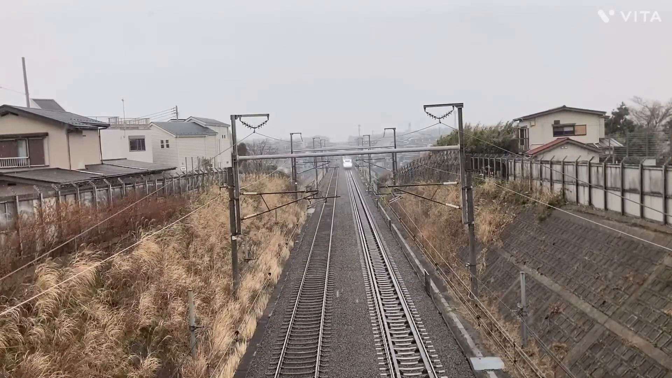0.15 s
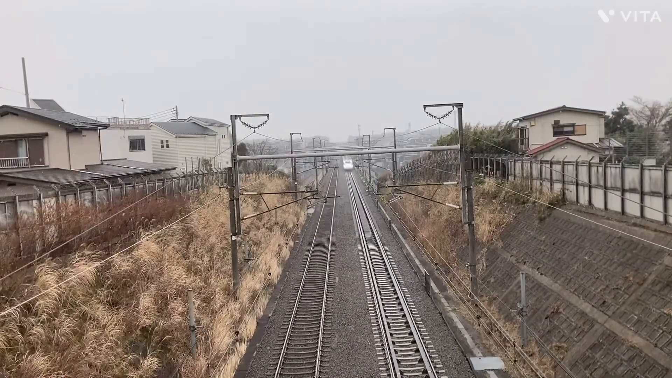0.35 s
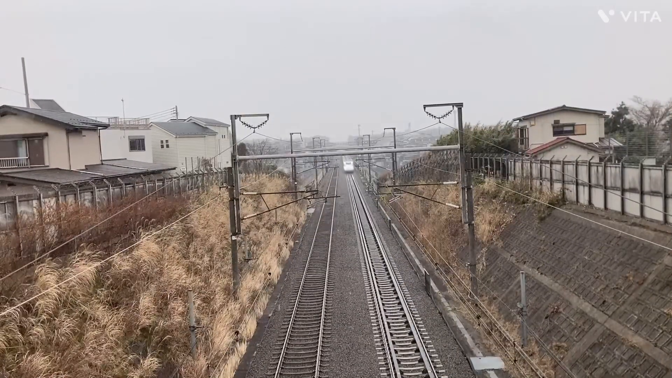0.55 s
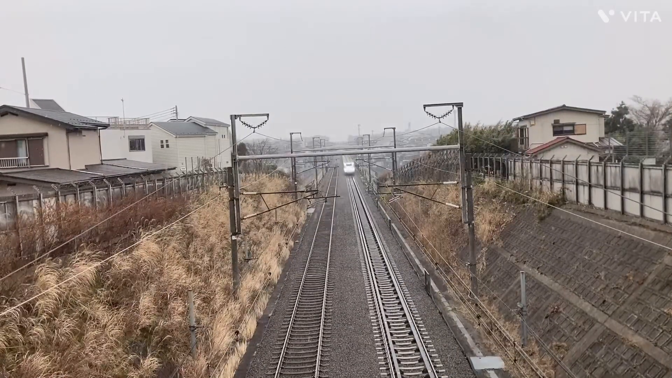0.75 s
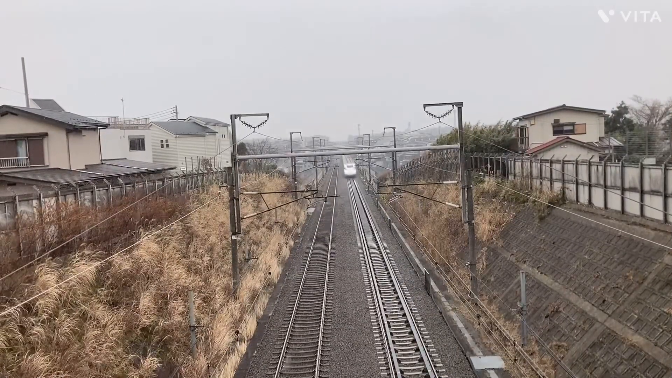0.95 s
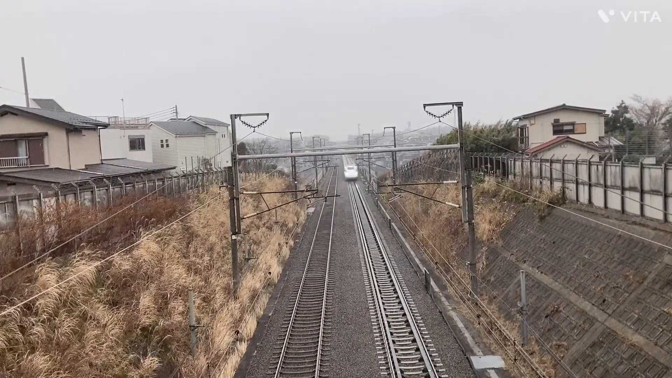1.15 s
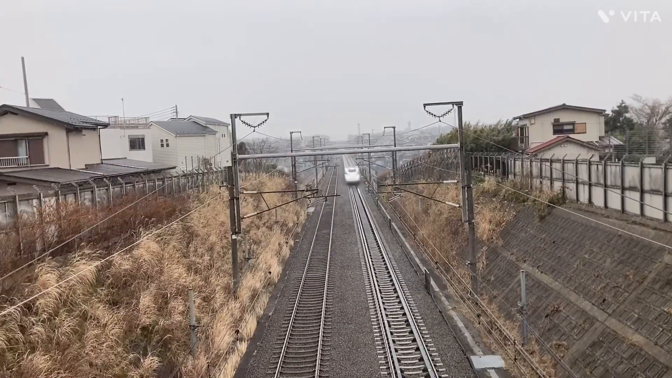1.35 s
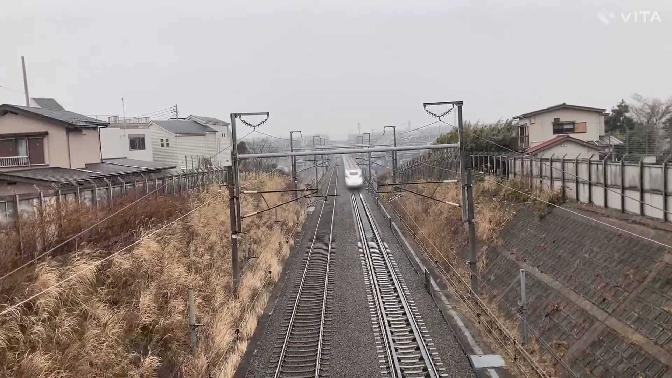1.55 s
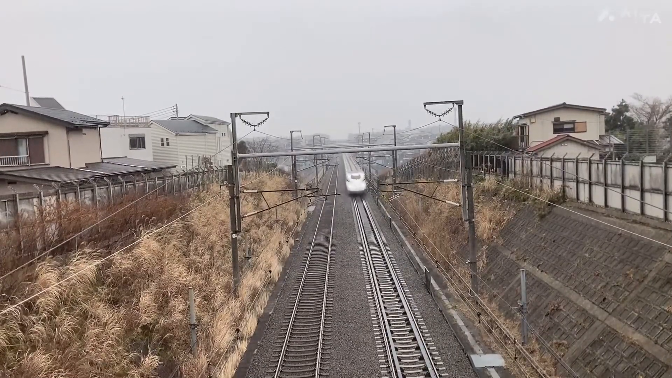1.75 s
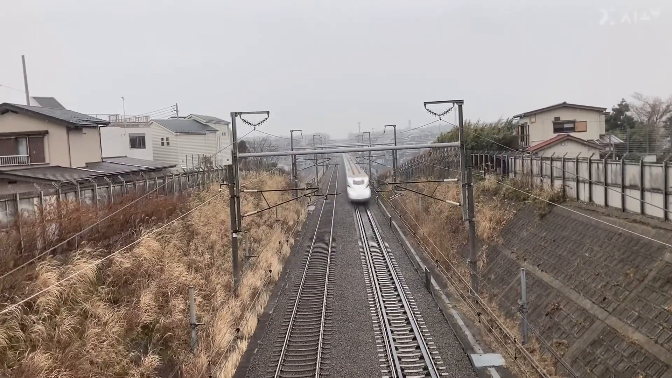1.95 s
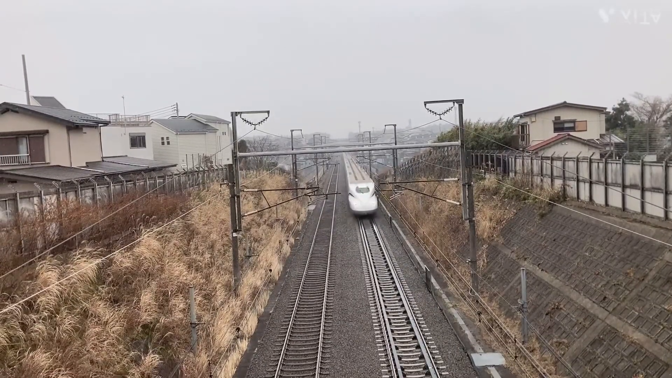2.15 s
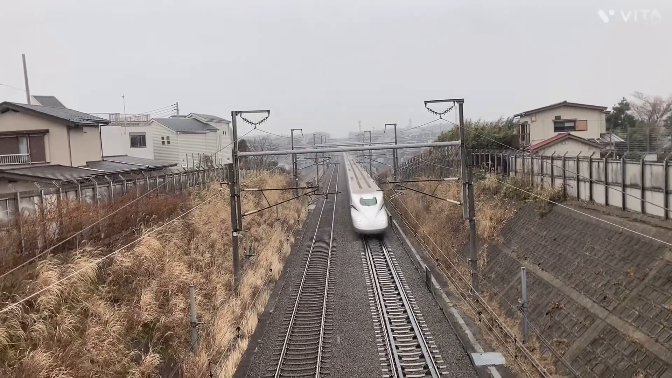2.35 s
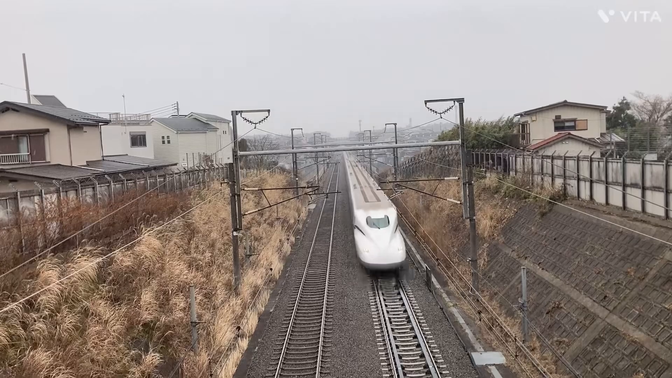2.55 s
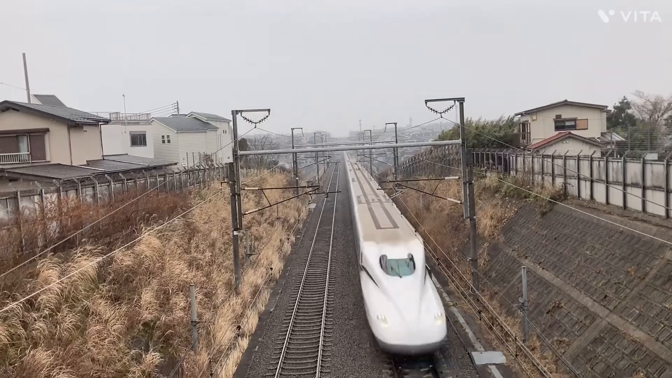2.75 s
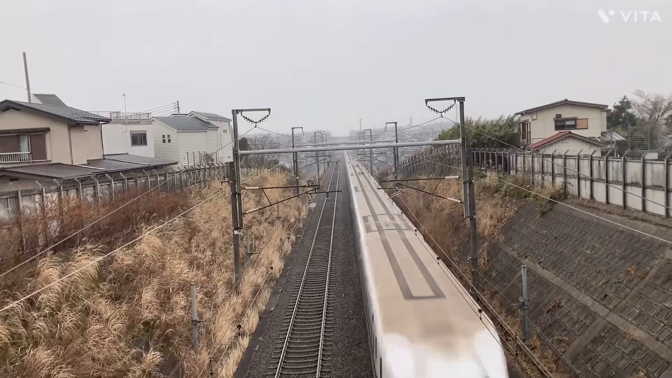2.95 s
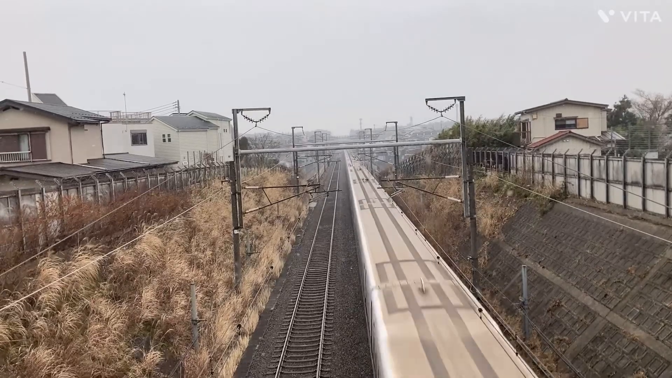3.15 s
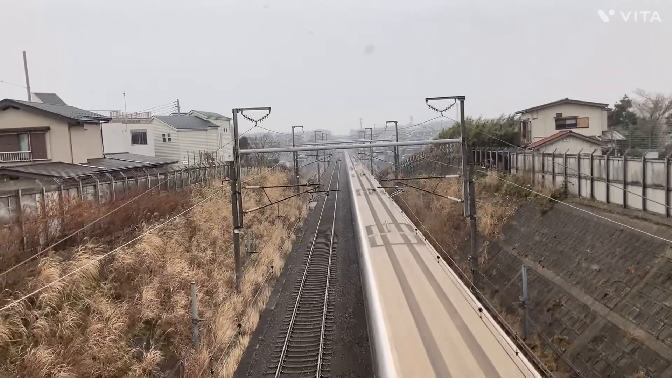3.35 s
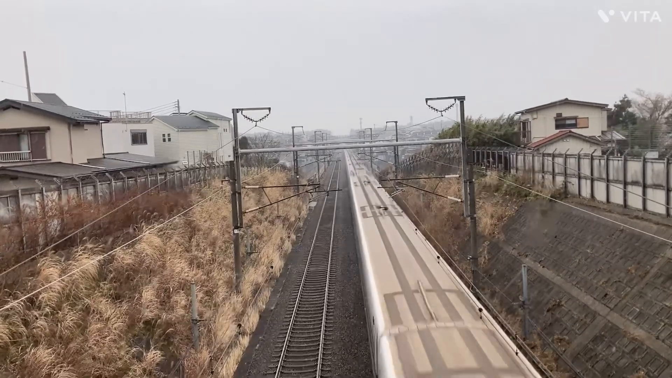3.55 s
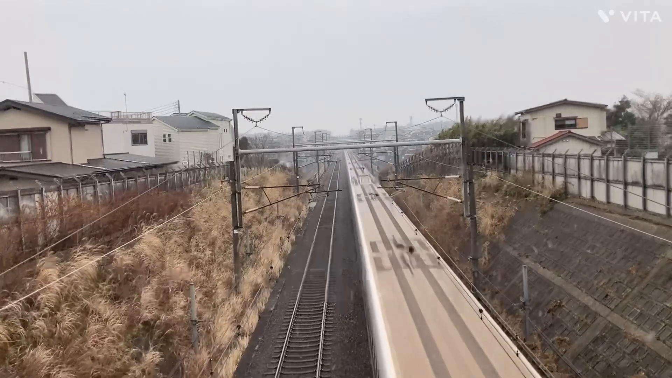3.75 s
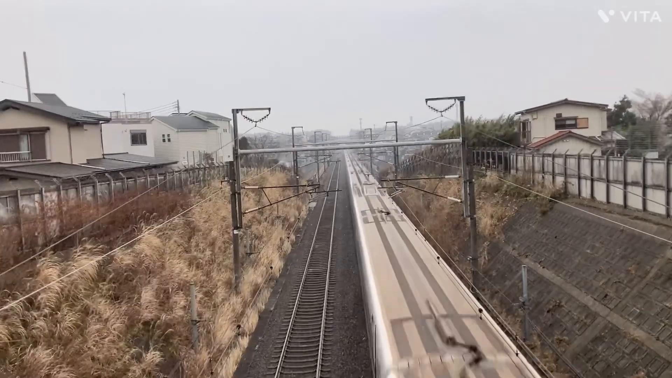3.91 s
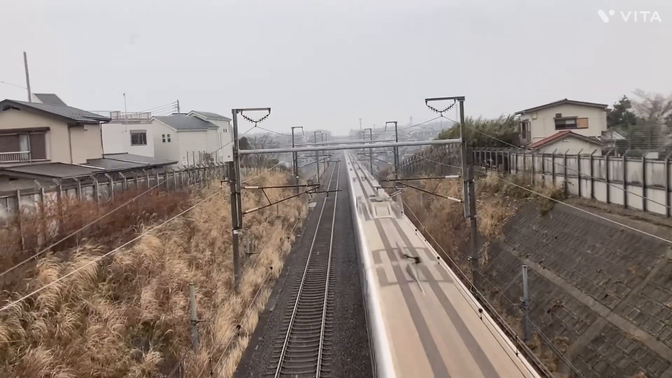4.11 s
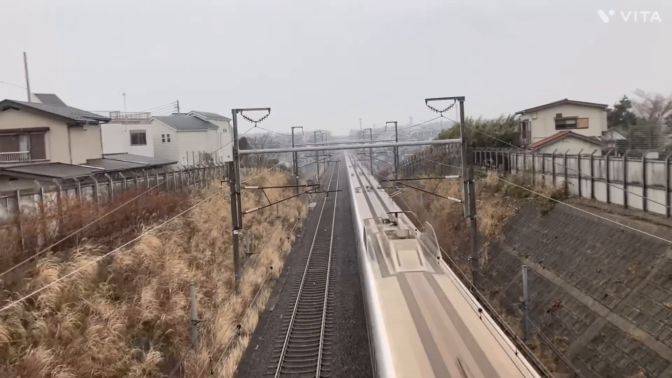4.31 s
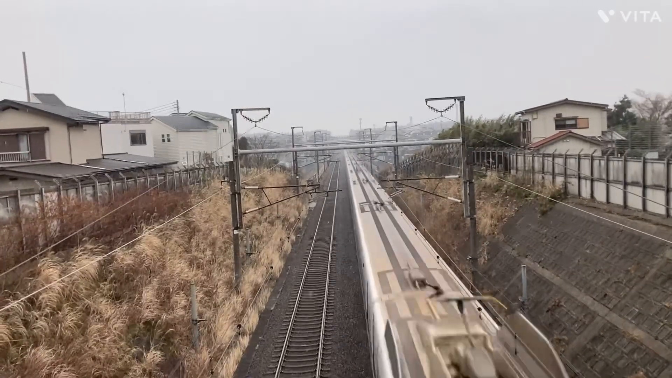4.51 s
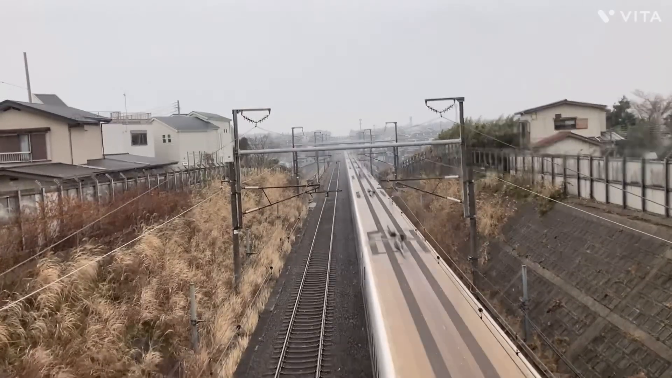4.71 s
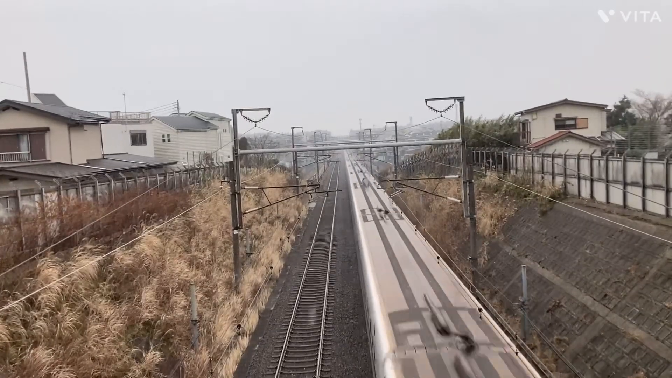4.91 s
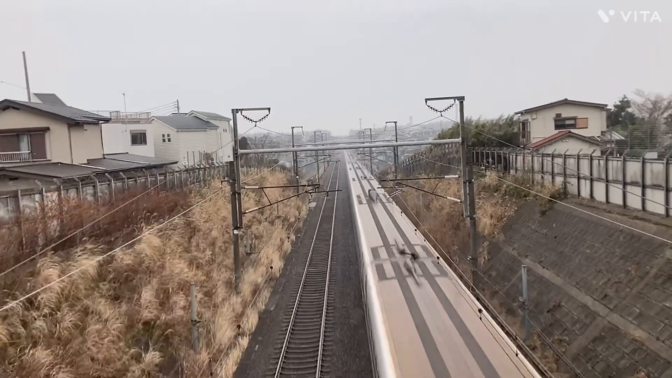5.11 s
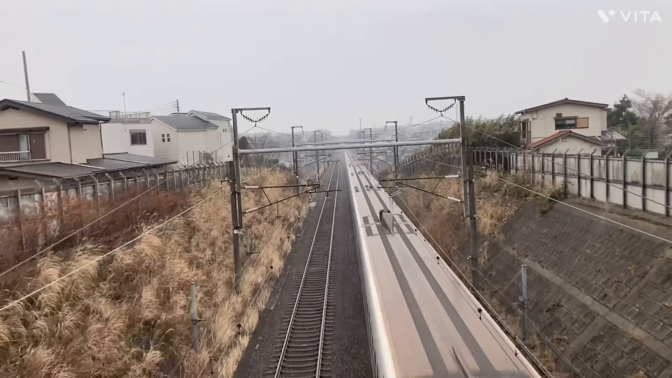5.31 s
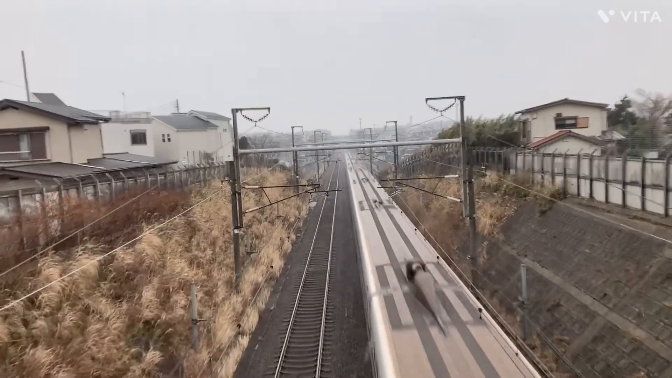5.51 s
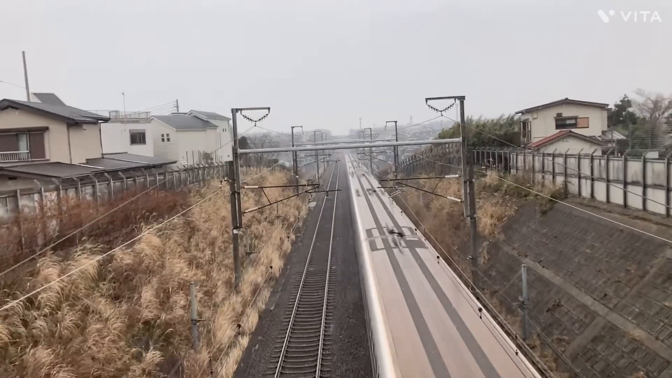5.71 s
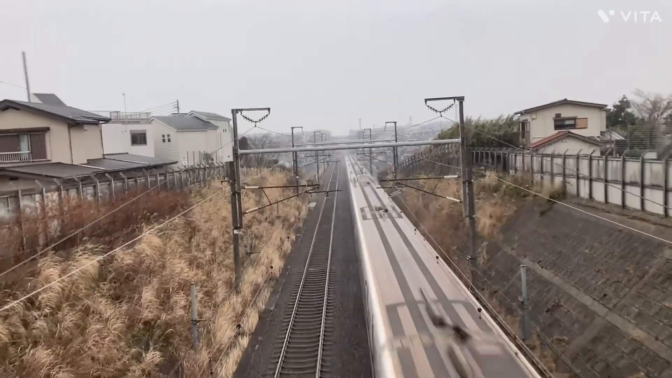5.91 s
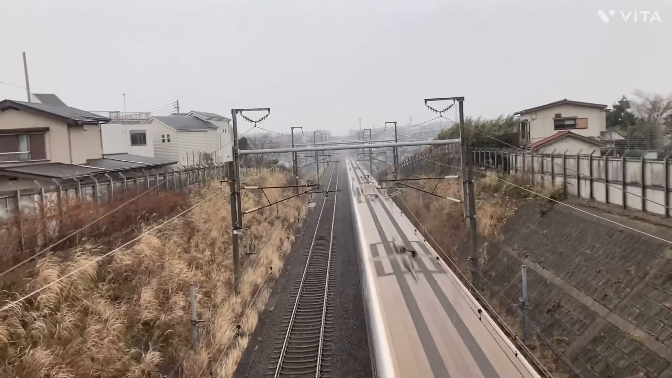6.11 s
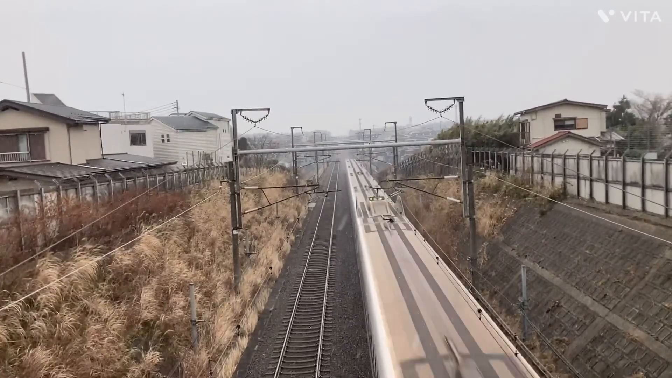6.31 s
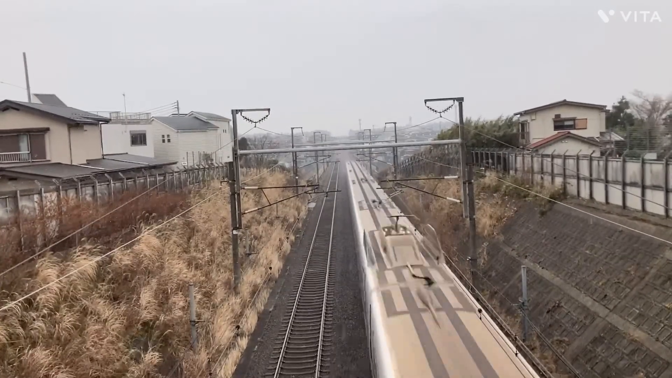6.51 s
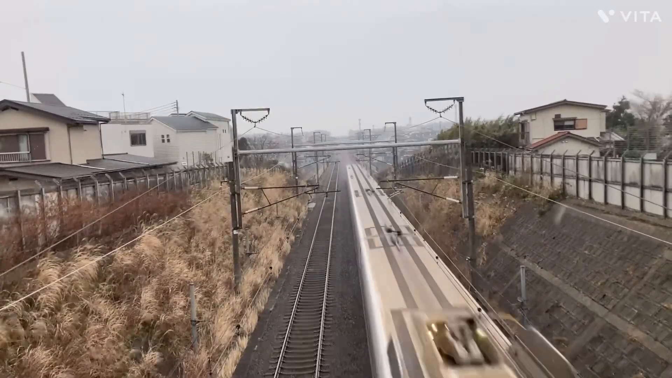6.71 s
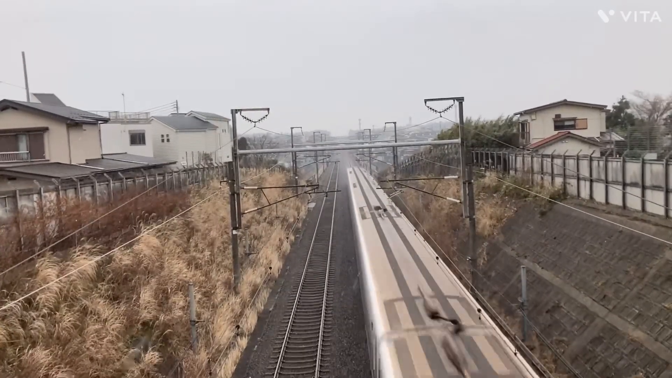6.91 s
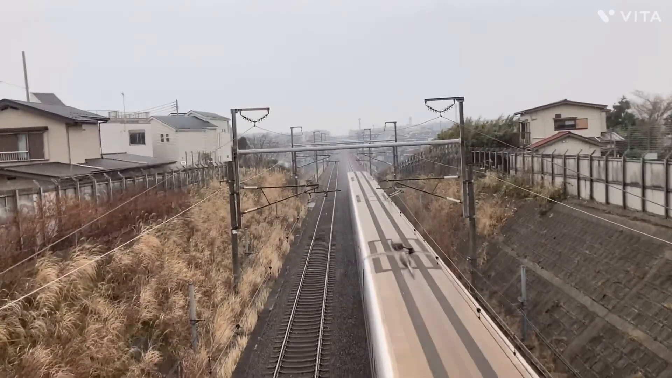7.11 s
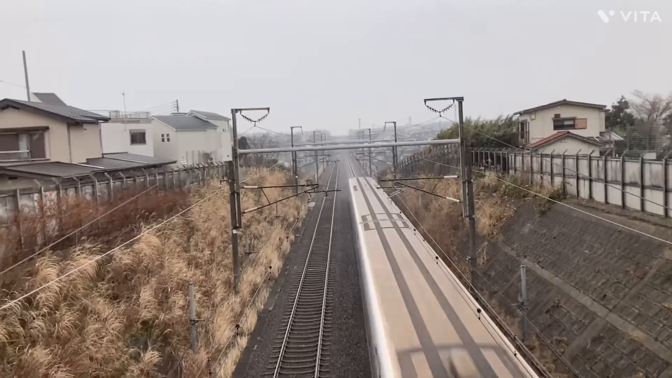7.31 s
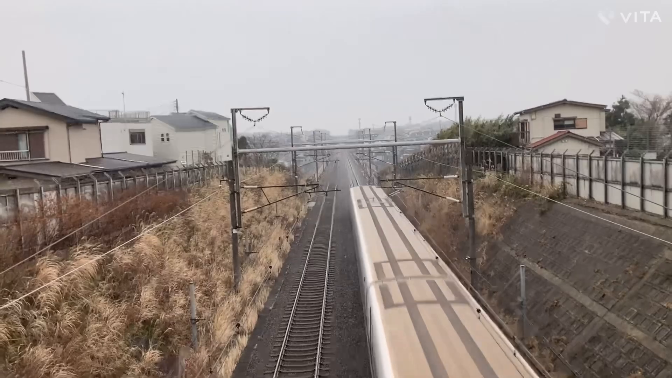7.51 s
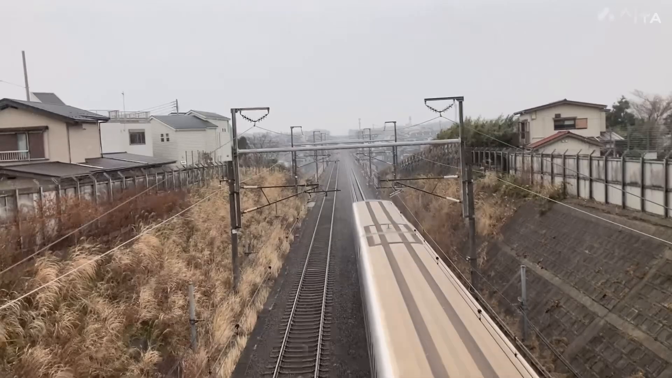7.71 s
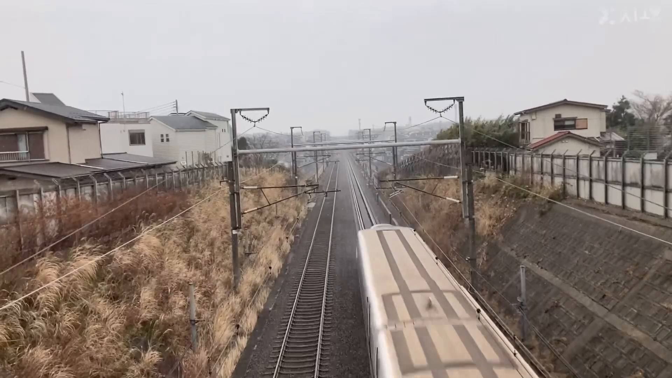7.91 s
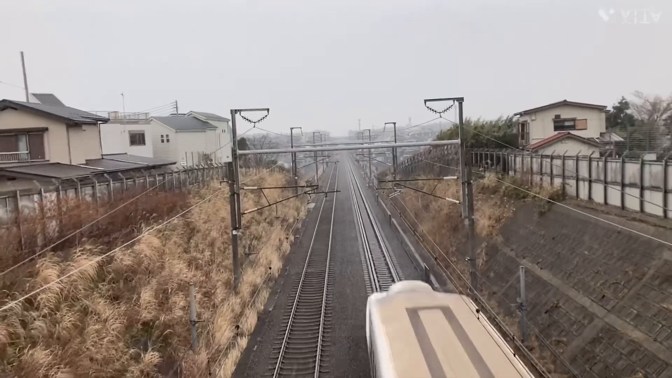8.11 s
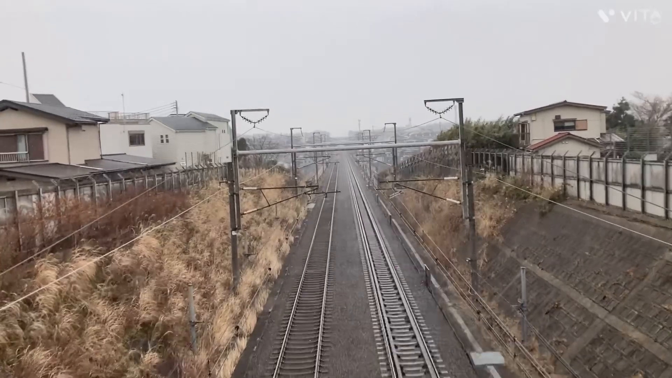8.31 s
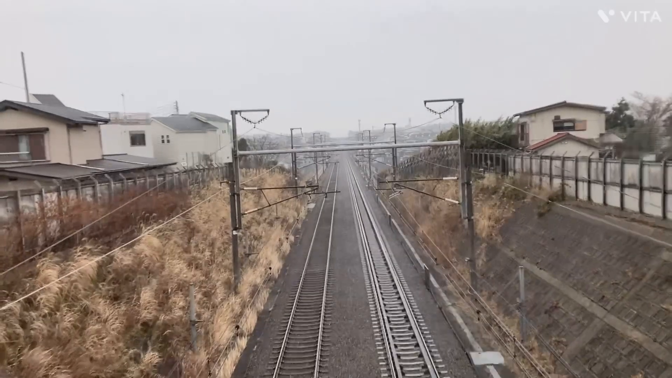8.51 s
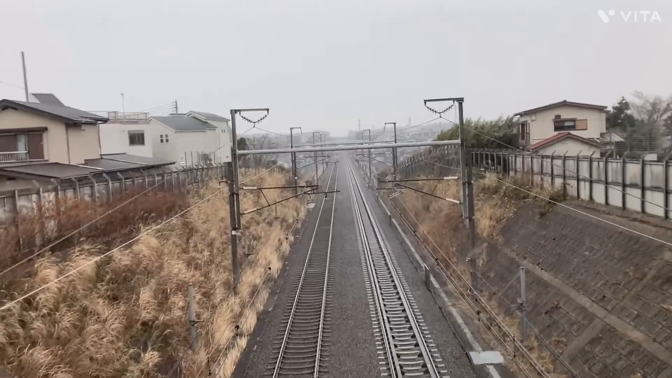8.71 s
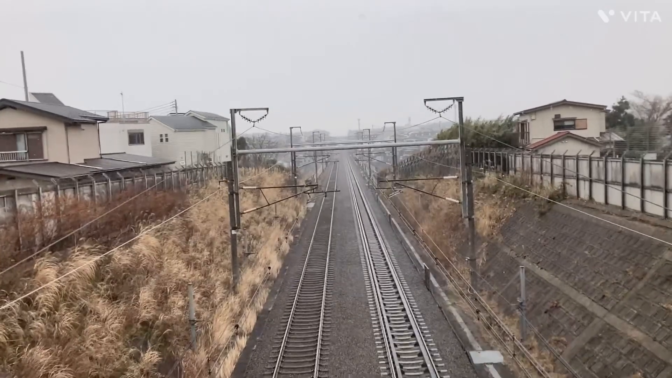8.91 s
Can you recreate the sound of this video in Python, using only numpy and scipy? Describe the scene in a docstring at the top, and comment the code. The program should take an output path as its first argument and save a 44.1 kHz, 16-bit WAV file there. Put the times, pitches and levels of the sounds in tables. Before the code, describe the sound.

Heard from a bridge, distant roar swells into a fast train's deep thundering pass below, with ringing track and whooshing bogies, then drops away abruptly.

```python
"""On a bridge over a cutting: a sixteen-car high-speed train passes right underneath.
Ahead of it: distant roar, climbing drone and singing rails, as coloured noise and wavering tones.
Under the bridge: fluttering flow noise rumbles and hisses, bogie pairs swish by, track modes ring.
Two pantographs roar past as noise bursts, the first with a vortex whistle; wake gusts end the pass."""
import sys
import numpy as np
from scipy import signal
from scipy.fft import rfft, irfft, next_fast_len
from scipy.io import wavfile

SR = 44100
rng = np.random.default_rng(int(sys.argv[2]) if len(sys.argv) > 2 else 0)


def file_out(sig):
    """Save sig as 16-bit WAV at sys.argv[1]."""
    # one column per channel
    cols = np.atleast_2d(sig).T
    # limit, then scale
    lim = np.clip(cols, -1, 1)
    pcm = np.round(lim * 32767).astype(np.int16)
    wavfile.write(sys.argv[1], SR, pcm)


N = 394694
TIME_S = np.arange(N) / SR
FFT_SIZE = next_fast_len(N)
FREQ_HZ = np.maximum(np.arange(FFT_SIZE // 2 + 1) * SR / FFT_SIZE, 1)

# Train ends reach the bridge
NOSE_S, TAIL_S = 2.897, 8.335
# Rush of air below, strongest at the nose: t/s, level/dB
RUSH = [(2.8, 8), (3.05, 8.5), (3.5, 6.5), (3.95, 5), (4.55, 7), (4.92, 0), (5.55, 1.5), (5.92, 0),
        (6.2, 2), (6.7, 1), (7.2, 0.5), (8.4, -0.5)]
# Whole-train sounds: base level/dB, share of rush, rise/(dB/s), hold after tail/s, fall/(dB/s)
DEEP_PASS = (-20, 0.38, 27, 0.6, 84)
RUMBLE_PASS = (-22, 0.71, 19, 0.6, 46)
HISS_PASS = (-37.5, 1.2, 27.5, 0.13, 45.5)
ROLL_PASS = (-34.5, 1.2569, 19, 0.3, 55)
RING_PASS = (-38, 0.78, 24, 0.0, 68)

# Noise colours, relative density: f/Hz, level/dB
# Boundary layer: large eddies
DEEP_SPECTRUM = [(25, -29), (40, -11.5), (55, -0.5), (75, 1), (95, -0.5), (130, -7.5), (250, -88)]
# Boundary layer: middle eddies
RUMBLE_SPECTRUM = [(60, -13.5), (90, -5.5), (115, -1), (180, -0.5), (235, -4), (310, -9.5), (400, -16.5),
                   (600, -24), (1500, -72)]
# Boundary layer: smallest eddies
SKIN_SPECTRUM = [(2000, -55), (4500, -13), (6000, -3.5), (7200, 2), (10500, 1.5), (13000, 0), (16000, 2)]
# Rolling wheels
ROLL_SPECTRUM = [(100, -16), (430, 1), (780, 0.8), (1100, -2.5), (1450, -3.5), (2000, -5.5), (2400, -10.5),
                 (3500, -9.5), (5000, -12), (7000, -21.5), (16000, -48)]
# Bogie swish
SWISH_SPECTRUM = [(700, -11.5), (1500, -0.5), (2200, -1), (3100, -2.5), (4200, -5.5), (5600, -12.5),
                  (8000, -8.5), (16000, -14)]
# Bogie roar
BOGIE_ROAR_SPECTRUM = [(100, -16), (250, 3.5), (450, -10), (650, 6), (1000, -2), (1500, 0), (2200, -6.5),
                       (5000, -27.5)]
# Air torn by roof gear
TEAR_SPECTRUM = [(50, -16), (120, 1.5), (260, 2.5), (450, -8), (700, -4), (1300, -7.5), (2200, -12.5),
                 (5000, -19.5), (8000, -16), (16000, -21)]
# Wake gusts on the microphone
BUFFET_SPECTRUM = [(40, -7), (200, 6.5), (400, 2), (800, -6.5), (1200, -14), (2000, -26), (5000, -55),
                   (16000, -73)]
# Train in the distance
DISTANT_SPECTRUM = [(120, 6), (200, -1), (350, 2.5), (550, 3), (760, 5), (1020, 1.5), (1220, -5.5),
                    (1450, 1), (1830, 1), (1990, -4), (3000, -6), (4200, -16), (6500, -26), (9500, -44),
                    (16000, -42)]

# Bogies at car ends: t/s, roar/dB, swish/dB, swish half length/s, track note/dB
BOGIES = [(3.069, -25, -22.5, 0.046, -38), (3.361, -46, -26, 0.046, -45), (3.729, -45, -24.5, 0.048, -33),
          (4.052, -23.5, -26, 0.049, -38), (4.42, -22.5, -26, 0.089, -40), (4.72, -25.5, -32, 0.054, -45),
          (5.07, -26.5, -30.5, 0.07, -41), (5.396, -28, -29, 0.051, -39), (5.74, -24, -46, 0.043, -37),
          (6.063, -26.5, -26, 0.042, -37), (6.398, -26.5, -31, 0.051, -43),
          (6.74, -27.5, -26.5, 0.068, -42.5), (7.081, -26, -28.5, 0.059, -40),
          (7.42, -25.5, -30, 0.055, -42), (7.761, -44, -31.5, 0.067, -41), (8.101, -50, -31.5, 0.073, -39),
          (8.491, -32.5, -50, .04, -51)]
BOGIE_RUMBLE_DB = -2.5   # relative to bogie roar
GAP_RUMBLE_DB, GAP_SPAN_S = -2, 0.071   # car-gap churn, relative to body rumble
# Swishes at car gaps: t/s, f/Hz, width/Hz, peak/dB
GAP_HISSES = [(4.05, 3300, 900, -31), (5.39, 2570, 700, -28.5), (6.06, 3010, 1100, -29),
              (8.41, 3800, 1500, -38)]
GAP_HISS_SPAN_S = 0.025
# Echo off the cutting's side, latest with a bogie right below
WALL_LAG_MS, WALL_SPAN_S, WALL_ECHO_DB = 6.5, 0.297, -11
# Short wandering echo, makes rolling and swish ragged
RAGGED_LAG_MS, RAGGED_LAG_SWING_MS, RAGGED_ECHO_DB = 3.6, 0.7, -7

# Track resonances, one narrow and one broad: f/Hz, width/Hz, level/dB
TRACK_MODES = [(1804, 24, -12), (2000, 340, -9)]
RING_WAVER_DB, RING_WAVER_HZ = 4, 13
RING_LAG_S, RING_SPAN_S = 0.037, 0.046   # track note peaks just behind each bogie
SQUEAL_HZ, SQUEAL_WAVER_HZ, SQUEAL_WAVER_DB = 1814, 11.06, 2.5
SQUEAL_SPREAD_DB = -8   # noisy skirt of the track note
# Track notes under single wheels: t/s, f/Hz, peak/dB
SQUEALS = [(2.897, 2164, -28), (2.955, 1819, -22.5), (3.088, 1830, -20), (3.425, 1808, -23),
           (3.525, 1830, -28), (4.087, 1803, -27), (4.43, 1805, -28), (5.13, 2015, -36), (5.468, 1884, -29),
           (5.764, 1975, -35), (6.12, 1880, -32), (6.583, 1819, -30), (7.68, 1960, -32), (8.104, 2072, -32),
           (8.145, 1800, -30), (8.435, 1808, -31.5), (8.487, 1776, -33)]
SQUEAL_SPAN_S, SQUEAL_SAG = 0.019, 0.008   # sag: pitch share lost either side of the peak

# Pantographs, roof fittings and tail tearing the air: t/s, peak/dB, rise/s, fall/s
ROOF_GEAR = [(4.09, -23, 0.019, 0.048), (4.68, -15.5, 0.095, 0.035), (5.73, -29.5, .025, 0.017),
             (5.768, -28, .008, .012), (5.806, -22, 0.017, 0.0082), (6.54, -25, 0.091, 0.084),
             (6.89, -16.5, 0.085, 0.027), (7.47, -27.5, 0.039, 0.022), (8.575, -34, 0.033, 0.02)]
ROOF_RUMBLE_DB, ROOF_PRESSURE_DB = -0.5, -1.5   # relative to each burst
# Roof cavity howl: t/s, peak/dB, rise/s, fall/s
HOWLS = [(5.69, -27, 0.012, 0.025), (5.718, -19, .003, .004), (6.85, -27, 0.025, 0.019)]
CAVITY_HZ, CAVITY_WIDTH_HZ = 1400, 330
SIZZLE_HZ, SIZZLE_WIDTH_HZ, SIZZLE_DB = 6600, 1000, -37
# First pantograph's whistle: t/s, f/Hz, level before WHISTLE_GAIN_DB/dB
WHISTLE = [(3.95, 6280, -70), (4.03, 6250, -45), (4.17, 6280, -43), (4.29, 6330, -26.5), (4.33, 6320, -31),
           (4.355, 6240, -47), (4.4, 6280, -29), (4.47, 6280, -36), (4.54, 6280, -30), (4.6, 6150, -47),
           (4.65, 6110, -29), (4.668, 5960, -38), (4.682, 5870, -33), (4.71, 5700, -70)]
WHISTLE_GAIN_DB, WHISTLE_SKIRT_DB = 1.5, -7
WHISTLE_JITTER_HZ, WHISTLE_FLUTTER_DB = 22, 3

# Brief low notes in the rumble: t/s, f/Hz, peak/dB
LOW_NOTES = [(3.007, 91, -14), (3.007, 231, -14.5), (3.042, 327.6, -20), (4.156, 204, -16),
             (4.162, 69.1, -10), (4.441, 156, -12), (4.59, 113.3, -12), (6.844, 86, -12.5),
             (6.867, 177.3, -16), (6.891, 296.7, -15.5), (7.442, 160.4, -18)]
LOW_NOTE_SPAN_S, LOW_NOTE_SAG = 0.026, 0.0399
# Wake gusts on the microphone: t/s, peak/dB, rise/s, fall/s
GUSTS = [(8.694, -17.5, .0006, 0.0053), (8.721, -17, 0.00092, 0.012), (8.744, -18, .002, 0.0069),
         (8.758, -17, .0015, 0.0063), (8.778, -15.5, 0.0044, 0.0078), (8.798, -13, 0.0017, 0.0032),
         (8.806, -16, .0015, 0.0052), (8.825, -25, .004, 0.0095), (8.87, -34, 0.022, 0.045)]

# Carried along the cutting: t/s, far roar/dB, far wheel hiss/dB, rail singing/dB, boom/dB
AHEAD = [(0, -51.5, -72, -63.5, -42), (.65, -47, -67, -59.5, -41), (1.0, -41, -55, -57, -38.5),
         (1.5, -36, -47, -51, -37), (2.0, -35.5, -45.5, -45.5, -29), (2.55, -32.5, -47, -43, -26),
         (3.2, -40, -50.5, -41.5, -22.5), (8.3, -37.5, -51, -46, -31.5), (8.95, -46.5, -61, -42.5, -33)]
FAR_RUMBLE_DB = 4           # relative to far roar
FAR_RUMBLE_TOP_DB = -47.5   # far-roar level at which the far rumble stops growing
FAR_LAG_MS, FAR_LAG_MS_PER_S, FAR_ECHO_DB = 6.2, 0.481, -13   # cutting-side echo
FAR_RING_HZ, FAR_RING_WIDTH_HZ, FAR_RING_DB = 1640, 290, -9   # level relative to far roar
FAR_HISS_HZ, FAR_HISS_WIDTH_HZ = 3200, 750
BOOM_HZ, BOOM_WIDTH_HZ = 37, 12
# Low drone ahead of the train: t/s, f/Hz, level/dB
DRONE = [(.3, 58.4, -44), (.52, 58.6, -33), (.64, 58.35, -59), (.77, 57, -41), (1.1, 58.3, -43),
         (1.55, 56.96, -30), (1.75, 59.9, -42), (1.95, 62, -26), (2.25, 74, -24.5), (2.5, 78, -24),
         (2.9, 80, -60)]
DRONE_WAVER_HZ, DRONE_WAVER_DB = 4, 3.2
# High rail modes: f/Hz, width/Hz, level/dB
RAIL_MODES = [(10300, 420, -2), (12430, 880, -0.5), (14260, 660, 1.5), (15300, 900, -4)]
RAIL_TOP_HZ, RAIL_TOP_FALL_DB_PER_S = 13000, 23   # singing above this dies behind the tail
THIN_WHINE_HZ, THIN_WHINE_WIDTH_HZ, THIN_WHINE_DB = 10220, 37, -61

# Left-right likeness, clipped at use; upper treble in opposite phase: f/Hz, correlation
LIKENESS = [(160, 0.97), (300, 0.94), (600, 0.56), (1200, 0.26), (1800, 0.33), (3200, 0.12), (4300, 0.5),
            (5300, -0.66), (6200, -0.34), (7000, -1.6)]
# Likeness straight ahead, sides nearly equal in most bands: f/Hz, correlation
FAR_LIKENESS = [(270, .96), (450, .82), (1150, 0.75), (1600, 1), (2900, .3), (4700, 1), (9000, 0)]
# Left minus right: f/Hz, level/dB
BALANCE = [(50, -1.5), (160, 1.5), (350, 1), (600, -2), (1200, -1), (2200, 1.5), (4300, 2), (7000, -1)]
BASS_LAG_MS, TREBLE_LAG_MS = 0.052, 0.2204   # left hears it later
CUTOFF_HZ = 15730


def body_air(pair, bogie_roar, roof_bursts):
    """Boundary layer: large eddies throb and rumble, also at gaps, bogies and roof gear; the smallest hiss."""
    pressure = together(passage(*DEEP_PASS), from_db(ROOF_PRESSURE_DB) * roof_bursts)
    deep = pressure * turbulence(DEEP_SPECTRUM, pair, eddy_db=0.5, eddy_hz=5.3)

    gaps = swells([(t_s, GAP_RUMBLE_DB, GAP_SPAN_S, GAP_SPAN_S) for t_s, *_ in BOGIES])
    body_churn = passage(*RUMBLE_PASS) * together(0.96, gaps)
    far_roar_db = in_time(AHEAD)[0]
    far_churn = from_db(FAR_RUMBLE_DB + np.minimum(far_roar_db, FAR_RUMBLE_TOP_DB))
    bogie_churn = from_db(BOGIE_RUMBLE_DB) * bogie_roar
    roof_churn = from_db(ROOF_RUMBLE_DB) * roof_bursts
    churn = together(body_churn, far_churn, bogie_churn, roof_churn)
    rumble = churn * turbulence(RUMBLE_SPECTRUM, pair, eddy_db=1.5, eddy_hz=16.4)

    hiss = passage(*HISS_PASS) * turbulence(SKIN_SPECTRUM, pair, eddy_db=1.0, eddy_hz=16)
    return deep + rumble + hiss


def wheels(pair, bogie_roar, bogie_swish):
    """Rolling roars and rings the track; bogie pairs whine, roar and swish, with moving echoes."""
    rolling = passage(*ROLL_PASS) * turbulence(ROLL_SPECTRUM, pair, eddy_db=1.03, eddy_hz=11.0)
    swish = bogie_swish * turbulence(SWISH_SPECTRUM, pair, eddy_db=1.65, eddy_hz=34)
    roar = bogie_roar * turbulence(BOGIE_ROAR_SPECTRUM, pair, eddy_db=1.6, eddy_hz=25)
    ragged_lag_ms = RAGGED_LAG_MS + RAGGED_LAG_SWING_MS * drift(2.51)
    ragged = with_echo(rolling + swish, ragged_lag_ms, RAGGED_ECHO_DB)
    nearest_s = np.min([np.abs(TIME_S - t_s) for t_s, *_ in BOGIES], axis=0)
    wall_lag_ms = WALL_LAG_MS / np.hypot(1, nearest_s / WALL_SPAN_S)
    echoed = with_echo(ragged + roar, wall_lag_ms, WALL_ECHO_DB)
    whine = from_db(-35) * doppler_whine(f_hz=1875, shift=0.11, span_s=0.15, width_hz=30)
    return echoed + track_ringing(pair) + whine


def track_ringing(pair):
    """Rolling excites a narrow and a broad track resonance; their level wavers within fixed limits."""
    modes = together(*(resonance(*mode) for mode in TRACK_MODES))
    waver = from_db(RING_WAVER_DB * np.tanh(drift(RING_WAVER_HZ)))
    return passage(*RING_PASS) * waver * noise(modes, pair)


def doppler_whine(f_hz, shift, span_s, width_hz):
    """Each bogie's wheels whine roughly, sharp while nearing and flat once past."""
    out = np.zeros((2, N))
    for t_s, *_ in BOGIES:
        heard = np.abs(TIME_S - t_s) < 2 * span_s
        offset = (TIME_S[heard] - t_s) / span_s
        pitch_hz = f_hz * (1 - shift * offset / np.hypot(1, offset))
        fade = np.cos(offset * np.pi / 4) ** 2
        out[:, heard] += fade * narrow_band(pitch_hz, width_hz)
    return out


def squeal():
    """The sharpest track mode flares as an almost pure note per bogie; single wheels add own pitches."""
    level = swells([(t_s + RING_LAG_S, db, RING_SPAN_S, RING_SPAN_S) for t_s, *_, db in BOGIES])
    tone = wavering_tone(SQUEAL_HZ, SQUEAL_WAVER_HZ, SQUEAL_WAVER_DB, rate_hz=20)
    skirt = from_db(SQUEAL_SPREAD_DB) * narrow_band(np.full(N, SQUEAL_HZ), width_hz=63)
    return level * (tone + skirt) + passing_notes(SQUEALS, SQUEAL_SPAN_S, SQUEAL_SAG)


def gap_hisses():
    """Air squeezed through a car gap hisses briefly in a band that drops as it passes."""
    out = np.zeros((2, N))
    for t_s, f_hz, width_hz, peak_db in GAP_HISSES:
        heard = np.abs(TIME_S - t_s) < 0.2
        pitch_hz = f_hz * (1 - 0.13 * np.tanh((TIME_S[heard] - t_s) / GAP_HISS_SPAN_S / 2))
        level = fly_by(t_s, peak_db, GAP_HISS_SPAN_S, GAP_HISS_SPAN_S)[heard]
        out[:, heard] += level * narrow_band(pitch_hz, width_hz)
    return out


def roof(pair, roof_bursts):
    """Roof gear tears the air in broad bursts; a cavity howls, the second pantograph sizzles as it nears."""
    tearing = roof_bursts * turbulence(TEAR_SPECTRUM, pair, eddy_db=2.0, eddy_hz=18)
    howl = swells(HOWLS) * noise(resonance(CAVITY_HZ, CAVITY_WIDTH_HZ, 0) ** 2, pair)
    sizzle_level = fly_by(6.66, SIZZLE_DB, rise_s=0.048, fall_s=0.2)
    sizzle = sizzle_level * noise(resonance(SIZZLE_HZ, SIZZLE_WIDTH_HZ, 0), pair)
    return tearing + howl + sizzle


def whistle():
    """Vortices shed from a thin rod: a fitful tone with a rough skirt, dropping with the Doppler shift."""
    pitch_hz, level_db = in_time(WHISTLE)
    tone = wavering_tone(pitch_hz, WHISTLE_JITTER_HZ, WHISTLE_FLUTTER_DB, rate_hz=96)
    skirt = from_db(WHISTLE_SKIRT_DB) * narrow_band(pitch_hz, width_hz=300)
    sounding = (TIME_S > WHISTLE[0][0]) & (TIME_S < WHISTLE[-1][0])
    return sounding * from_db(WHISTLE_GAIN_DB + level_db) * (tone + skirt)


def low_notes():
    """Brief low notes in the rumble."""
    return passing_notes(LOW_NOTES, LOW_NOTE_SPAN_S, LOW_NOTE_SAG)


def wake():
    """Gusts behind the tail hit each microphone port on its own."""
    ports = np.eye(2)[:, :, None]
    return swells(GUSTS) * turbulence(BUFFET_SPECTRUM, ports, eddy_db=1.0, eddy_hz=110)


def approach(pair):
    """Far roar and singing wheels notched by an echo, surging wheel hiss and a throbbing low boom."""
    roar_db, hiss_db, _, boom_db = in_time(AHEAD)
    far_air = turbulence(DISTANT_SPECTRUM, pair, eddy_db=1.03, eddy_hz=24)
    far_ring = from_db(FAR_RING_DB) * noise(resonance(FAR_RING_HZ, FAR_RING_WIDTH_HZ, 0) ** 2, pair)
    lag_ms = FAR_LAG_MS + FAR_LAG_MS_PER_S * TIME_S
    roar = from_db(roar_db) * with_echo(far_air + far_ring, lag_ms, FAR_ECHO_DB)
    hiss_colour = resonance(FAR_HISS_HZ, FAR_HISS_WIDTH_HZ, 0)
    hiss = from_db(hiss_db + drift(8.8)) * noise(hiss_colour, pair)
    boom_colour = resonance(BOOM_HZ, BOOM_WIDTH_HZ, 0) * from_db(over_hz(DEEP_SPECTRUM))
    boom = from_db(boom_db + drift(11.0)) * noise(boom_colour, pair)
    return roar + hiss + boom


def drone():
    """A low unsteady note runs ahead of the train and climbs as it nears."""
    pitch_hz, level_db = in_time(DRONE)
    return from_db(level_db) * wavering_tone(pitch_hz, DRONE_WAVER_HZ, DRONE_WAVER_DB, rate_hz=7.1)


def rail_singing(pair):
    """High modes sing along the rails, with a thin steady whine; the highest die behind the tail."""
    modes = sum(from_db(db) * np.sqrt(width_hz) * resonance(f_hz, width_hz, 0) ** 2
                for f_hz, width_hz, db in RAIL_MODES)
    singing = noise(modes, pair)
    top = irfft(rfft(singing, FFT_SIZE) * (FREQ_HZ > RAIL_TOP_HZ), FFT_SIZE)[:, :N]
    singing = singing - top * (1 - plateau(0, TAIL_S, 0, RAIL_TOP_FALL_DB_PER_S))
    whine_colour = resonance(THIN_WHINE_HZ, THIN_WHINE_WIDTH_HZ, 0) ** 2
    whine = from_db(THIN_WHINE_DB) * noise(whine_colour, pair)
    return from_db(in_time(AHEAD)[2] + drift(12.0)) * singing + whine


def bogie_swells():
    """Roar and swish strengths as bogie pairs go under."""
    roar = swells([(t_s, db, 0.057, 0.05) for t_s, db, *_ in BOGIES])
    swish = swells([(t_s, db, span_s, span_s) for t_s, _, db, span_s, _ in BOGIES])
    return roar, swish


def passage(level_db, share, rise_db_per_s, hold_s, fall_db_per_s):
    """Whole-train level: grows until the nose arrives, follows the rush, dies behind the tail."""
    rush_db = in_time(RUSH)[0]
    return from_db(level_db + share * rush_db) * plateau(NOSE_S, TAIL_S + hold_s, rise_db_per_s, fall_db_per_s)


def plateau(start_s, end_s, rise_db_per_s, fall_db_per_s):
    """Attack, hold and release, straight in dB."""
    before_s = np.maximum(start_s - TIME_S, 0)
    after_s = np.maximum(TIME_S - end_s, 0)
    return from_db(-rise_db_per_s * before_s - fall_db_per_s * after_s)


def fly_by(t_s, peak_db, rise_s, fall_s):
    """A source swells as it nears and fades once past."""
    offset = (TIME_S - t_s) / np.where(TIME_S < t_s, rise_s, fall_s)
    return from_db(peak_db) / (1 + offset * offset / 4.7) ** 2


def swells(rows):
    """Combined strength of a row of sources flying by."""
    return together(*(fly_by(*row) for row in rows))


def together(*gains):
    """Strengths of unrelated sources add in power."""
    return np.sqrt(sum(gain ** 2 for gain in gains))


def turbulence(spectrum, pair, eddy_db, eddy_hz):
    """Flow noise whose strength flutters as eddies are shed."""
    return noise(from_db(over_hz(spectrum)), pair) * from_db(eddy_db * drift(eddy_hz))


def noise(gain, pair):
    """Stereo noise of a given colour; mean of both sides has rms 1."""
    spectrum = gain * sum(path * rfft(rng.standard_normal(FFT_SIZE)) for path in pair)
    out = irfft(spectrum, FFT_SIZE)[:, :N]
    return out / out.mean(axis=0).std()


def narrow_band(pitch_hz, width_hz):
    """Stereo noise round a gliding pitch: a sine of random strength and phase, rms about 1."""
    phase = 2 * np.pi * np.cumsum(pitch_hz) / SR
    smooth = signal.butter(2, width_hz / 2, fs=SR, output="sos")
    white = rng.standard_normal((2, 2, len(phase)))
    a, b = signal.sosfilt(smooth, white) * np.sqrt(SR / width_hz)
    return a * np.cos(phase) + b * np.sin(phase)


def wavering_tone(pitch_hz, waver_hz, waver_db, rate_hz):
    """A sine unsteady in pitch and strength."""
    turns = np.cumsum(pitch_hz + waver_hz * drift(rate_hz)) / SR
    return np.sin(2 * np.pi * turns) * from_db(waver_db * drift(rate_hz))


def passing_notes(rows, span_s, sag):
    """Brief notes that swell and fade, sharp before the peak and flat after it."""
    out = np.zeros(N)
    phases = rng.uniform(0, 2 * np.pi, len(rows))
    for (t_s, f_hz, peak_db), phase in zip(rows, phases):
        heard = np.abs(TIME_S - t_s) < 10 * span_s
        offset = (TIME_S[heard] - t_s) / span_s
        turns = np.cumsum(f_hz * (1 - sag * np.tanh(offset))) / SR
        out[heard] += from_db(peak_db) / np.cosh(offset) * np.sin(2 * np.pi * turns + phase)
    return out


def with_echo(x, lag_ms, echo_db):
    """One reflection of changing delay combs the sound with moving ripples; nominal power is kept."""
    echo = np.array([np.interp(TIME_S - lag_ms / 1000, TIME_S, side) for side in x])
    return (x + from_db(echo_db) * echo) / together(1, from_db(echo_db))


def resonance(f_hz, width_hz, level_db):
    """Response of one mode; its total power does not depend on its width."""
    detuning = (FREQ_HZ ** 2 - f_hz ** 2) / (FREQ_HZ * width_hz)
    return from_db(level_db) / np.sqrt(width_hz) / np.hypot(1, detuning)


def drift(rate_hz):
    """Random wander of spread 1: white noise through two equal poles, at SR / 40."""
    pole = np.exp(-80 * np.pi * rate_hz / SR)
    white = rng.standard_normal(N // 40 + 2002)
    slow = signal.lfilter([1], [1, -2 * pole, pole * pole], white)[2000:]   # skip settling
    return np.interp(np.arange(N) / 40, np.arange(len(slow)), slow / slow.std())


def microphone_pair():
    """Paths of shared and unshared sound to left and right, per frequency."""
    alike = np.clip(over_hz(LIKENESS), -0.999, 1)
    sides = np.array([[1], [-1]])
    lag_ms = np.where(FREQ_HZ > 4500, TREBLE_LAG_MS, BASS_LAG_MS)
    delay = np.exp(-1j * np.pi * FREQ_HZ * sides * lag_ms / 1000)   # half the lag per side
    reach = from_db(sides * over_hz(BALANCE) / 2) * delay
    return reach * np.sqrt(1 + alike), reach * sides * np.sqrt(1 - alike)


def pair_ahead():
    """Paths from straight ahead, reaching both sides at once."""
    alike = np.clip(over_hz(FAR_LIKENESS), -1, 1)
    return np.ones((2, 1)) * np.sqrt(1 + alike), np.array([[1], [-1]]) * np.sqrt(1 - alike)


def in_time(rows):
    """Each column of a curve at every sample."""
    t_s, *columns = np.transpose(rows)
    return [np.interp(TIME_S, t_s, column) for column in columns]


def over_hz(points):
    """A table joined by straight lines over log frequency."""
    f_hz, value = np.transpose(points)
    return np.interp(np.log(FREQ_HZ), np.log(f_hz), value)


def from_db(db):
    """Decibels to gain."""
    return 10 ** (np.asarray(db) / 20)


def scene():
    """The whole train, heard from the bridge."""
    pair = microphone_pair()
    bogie_roar, bogie_swish = bogie_swells()
    roof_bursts = swells(ROOF_GEAR)
    train = body_air(pair, bogie_roar, roof_bursts) + wheels(pair, bogie_roar, bogie_swish)
    train = train + squeal() + gap_hisses() + roof(pair, roof_bursts) + whistle()
    ahead = approach(pair_ahead()) + drone() + rail_singing(pair)
    return train + low_notes() + wake() + ahead


def record(dry):
    """The microphone sheds the lowest bass, the highest peaks are rounded and the top is cut."""
    heard = signal.sosfilt(signal.butter(2, 28, "high", fs=SR, output="sos"), dry)
    rounded = heard / (1 + heard ** 6) ** (1 / 6)
    top_cut = 1 / np.hypot(1, (FREQ_HZ / CUTOFF_HZ) ** 400)
    return irfft(rfft(rounded, FFT_SIZE) * top_cut, FFT_SIZE)[:, :N]


dry = scene()
out = record(dry)
file_out(out)
```